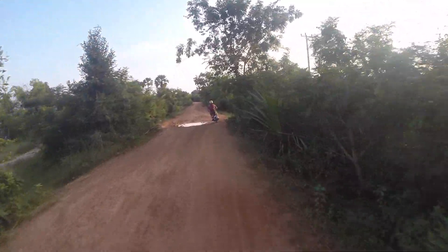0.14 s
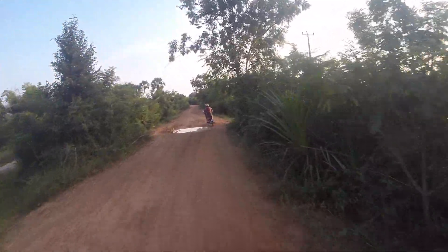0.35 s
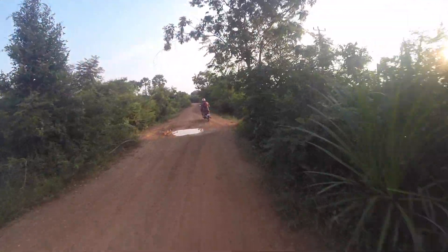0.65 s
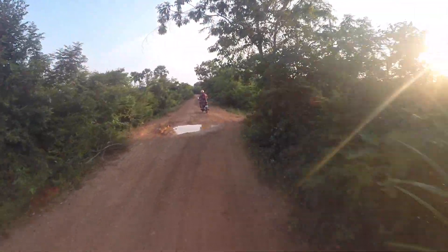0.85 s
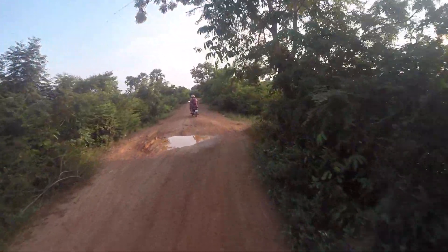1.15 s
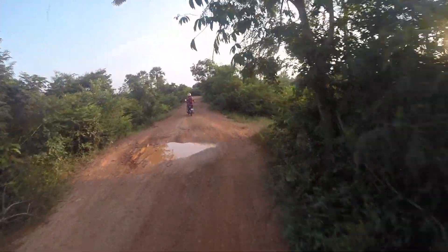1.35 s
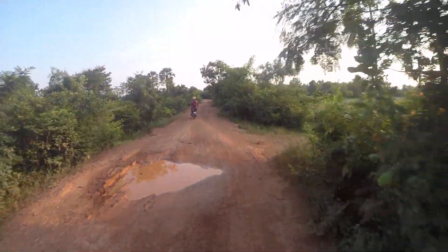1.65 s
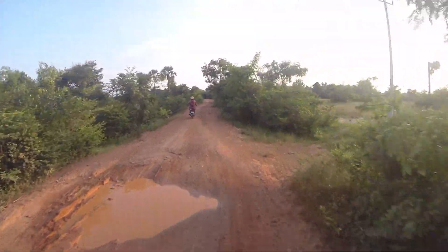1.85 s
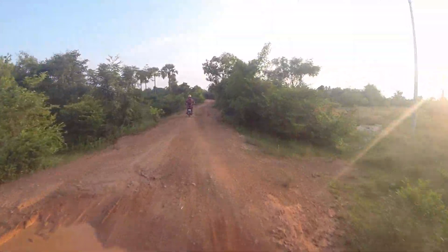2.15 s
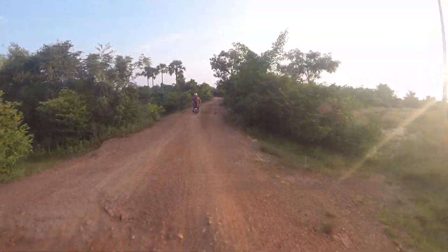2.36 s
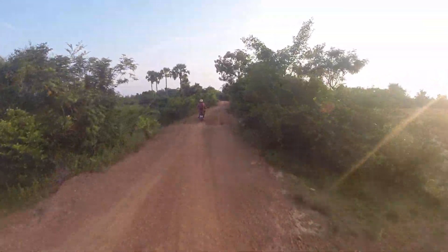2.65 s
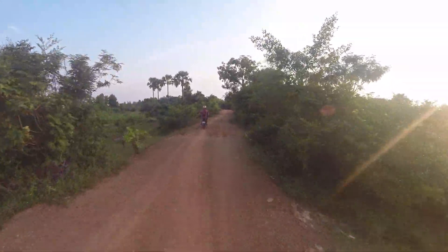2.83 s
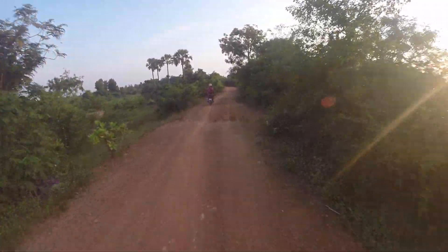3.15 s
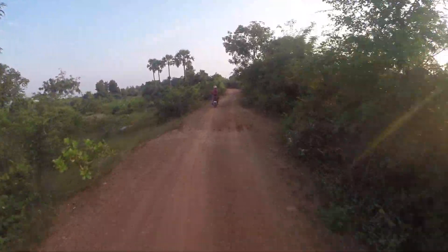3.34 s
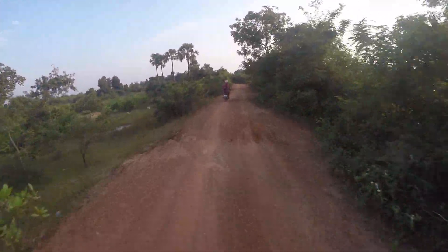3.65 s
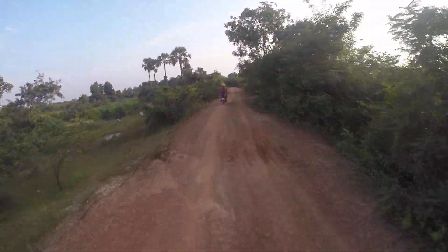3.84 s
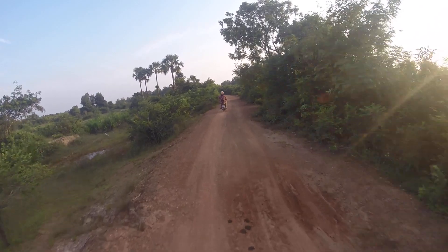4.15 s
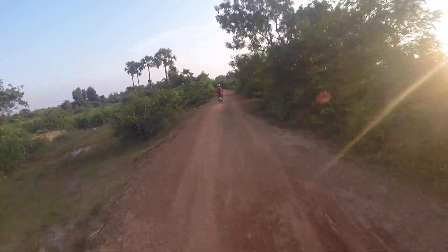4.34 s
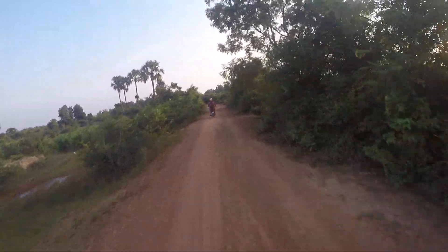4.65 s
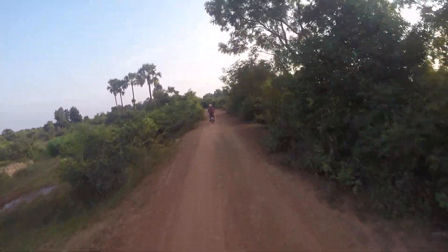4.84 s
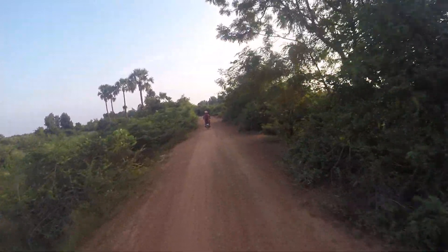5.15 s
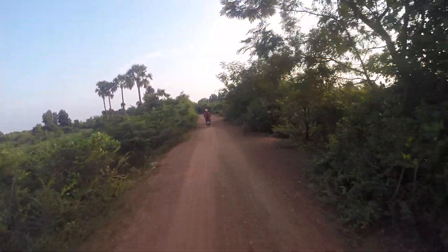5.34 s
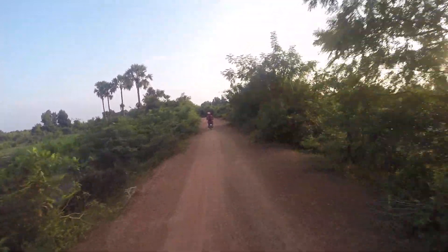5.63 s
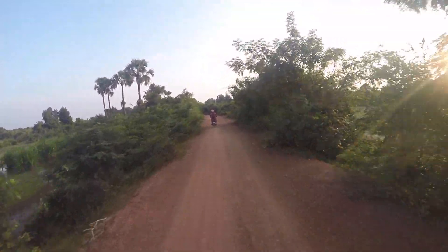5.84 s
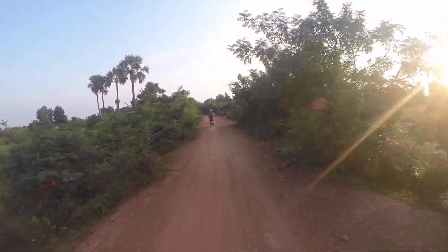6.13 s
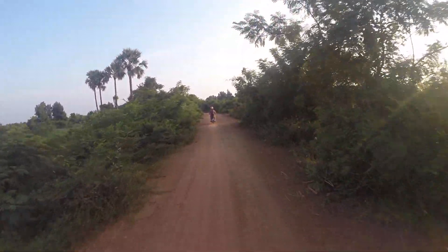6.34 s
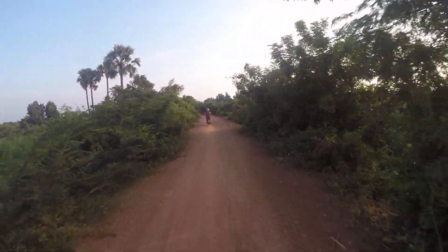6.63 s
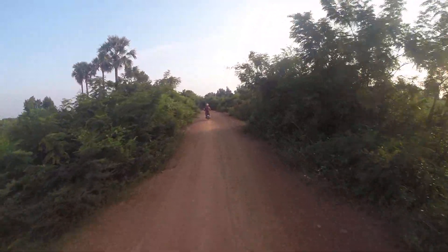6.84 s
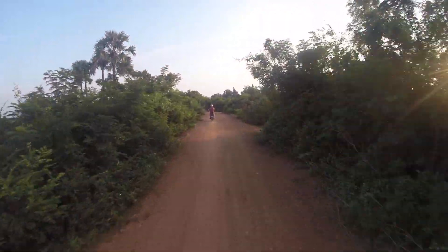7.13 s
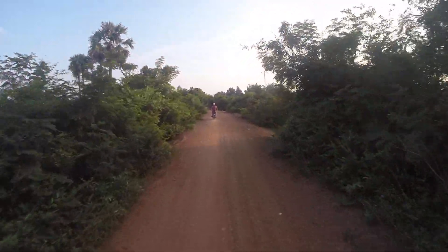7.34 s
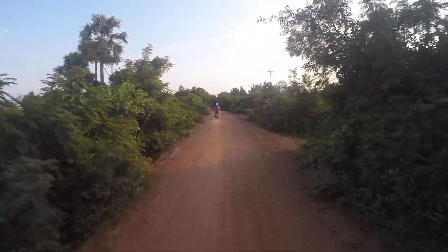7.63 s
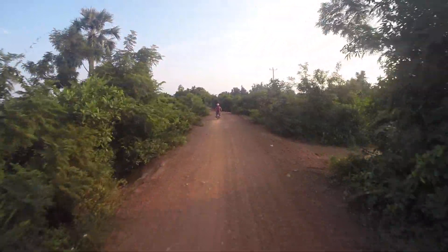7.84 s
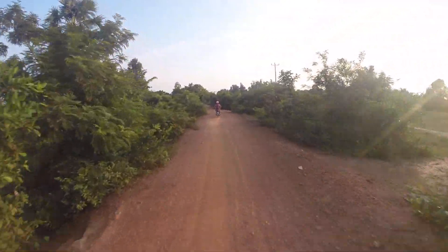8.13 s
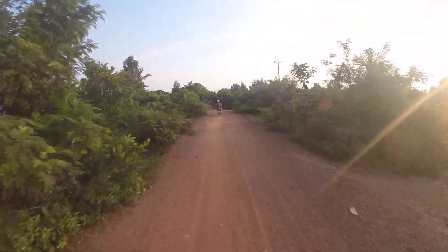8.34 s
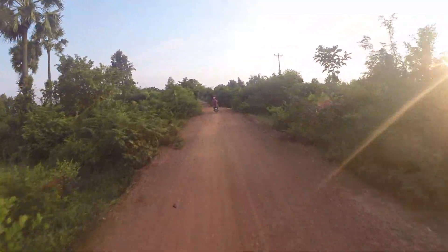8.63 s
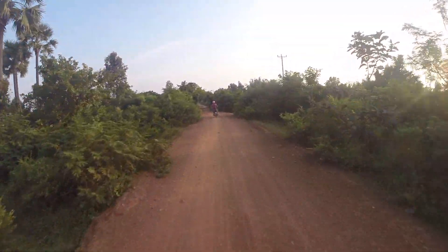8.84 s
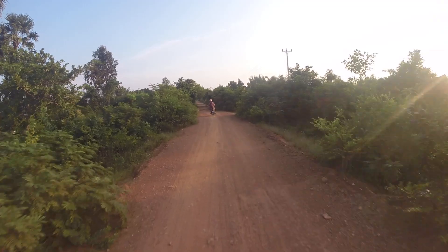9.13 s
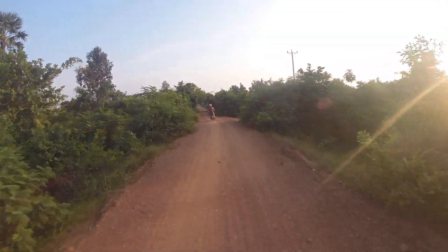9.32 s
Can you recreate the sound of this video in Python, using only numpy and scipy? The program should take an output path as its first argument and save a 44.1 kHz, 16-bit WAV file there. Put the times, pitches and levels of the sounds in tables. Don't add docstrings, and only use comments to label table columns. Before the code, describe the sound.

Close, muffled onboard sound of a small moped speeding up outdoors. Resonant headwind hisses and flutters around the plastic shell, above lumpy road rumble and a swaying low throb. Loose parts tick rapidly at first, then knock repeatedly. One violent bump bangs and clatters around the middle, its low thud dying away. Sparse knocks continue while wind strengthens; the engine stays a faint rising hum, insects are barely audible and electronics whine thinly.

```python
import sys
import numpy as np
from scipy import signal
from scipy.fft import rfft, irfft, next_fast_len
from scipy.io import wavfile
from scipy.ndimage import uniform_filter1d

SR = 44100
rng = np.random.default_rng(int(sys.argv[2]) if len(sys.argv) > 2 else 0)


def put_to_file(sound):
    columns = np.atleast_2d(sound).T
    safe = np.clip(columns, -1, 1)
    whole_steps = np.round(safe * 32767)
    wavfile.write(sys.argv[1], SR, whole_steps.astype(np.int16))


def field_ratio(decibels):
    return 10 ** (np.asarray(decibels, dtype=float) / 20)


N = 418068
T = np.arange(N) / SR

# [t/s, level/dB]
WIND = [(0, -48.5), (.2, -50), (.6, -49), (.92, -52), (1.15, -48.5), (1.5, -46.5), (2.5, -43.5),
        (2.75, -46.5), (3.0, -44), (3.6, -50), (4.2, -45.5), (4.55, -43.5), (4.95, -46), (5.55, -43),
        (6.0, -44), (7.1, -43), (8.0, -40.5), (9.48, -39.5)]
# [t/s, length/s, level/dB, centre f/Hz]
GUSTS = [(0.098, 0.1, -9, 5030), (.42, 0.082, -5, 3200), (0.784, 0.19, -7, 3200), (.85, 0.22, 4, 5500),
         (1.792, 0.14, 3.5, 2130), (2.3, 0.28, -1.5, 3200), (2.532, 0.037, 7.5, 2200),
         (2.763, 0.15, 7.5, 2360), (2.955, 0.072, -11, 3200), (3.205, 0.06, 4, 2650),
         (3.695, 0.29, 5, 2800), (4.193, 0.072, 7, 2950), (4.435, 0.089, -5, 3370), (5.02, 0.11, 9, 2900),
         (5.198, 0.14, -12, 2860), (5.478, 0.16, 8, 2820), (5.686, 0.16, 4, 1110),
         (5.726, 0.076, -8.5, 2800), (5.876, 0.15, 3.5, 3200), (6.1, 0.17, -5, 2950),
         (6.446, 0.12, 3.5, 3240), (6.601, 0.043, 3, 2510), (6.887, 0.12, 7, 3100), (7.28, 0.12, 2.5, 2190),
         (7.426, 0.1, -5.5, 3100), (7.756, 0.21, 1.5, 3300), (8.42, 0.1, -2, 3200), (8.824, 0.054, 3, 3120),
         (9.192, 0.12, 1, 3170), (9.47, 0.061, -6, 3360)]
GUST_OCTAVES, TREBLE_SHARE = 0.51, 0.32
MODE_GROUPS = [1400, 2250, 3200, 5500]
BRIGHT_FROM_HZ = 25.22
BRIGHTENING = [0.65, 2.5, 2.0]
SLOW_BALANCE = [-1, -3, -2.0]
# [f/Hz, width/Hz, level/dB]
HOUSING = [(520, 300, -5), (1027, 570, -7.5), (1289.6, 140, 4.5), (1270, 470, -7.5), (1535, 520, -4.5),
           (2070, 403, -1.5), (2412, 330, 2), (2800, 355, -4), (3170, 384, -3), (3660, 380, -17.5),
           (4600, 1300, -25), (5607, 860, -13), (6930, 1320, -21), (8000, 240, -33), (9740, 1140, -35.5),
           (12000, 790, -37.5)]
TIP_SHARE, TIP_DB = 0.35, -8.5
# [f/Hz, width/Hz, depth/0-1]
NOTCHES = [(2342, 87, 0.65), (2790, 100, 0.69), (6130, 270, 0.46)]

# [f/Hz, level/dB]
FRAME = [(20, -7), (45, -5.5), (75, -1), (120, 3), (170, -4.5), (250, -14.5), (320, -10), (400, -19.5),
         (700, -26), (1500, -61)]
# [t/s, level/dB, swell/s, fade/s]
RIDGES = [(0, -41.5, .1, 2.3), (.87, -48, 0.65, .06), (2.45, -40, 1.2, 1.5), (2.97, -35, 0.27, 0.39),
          (3.27, -43, 0.19, .2), (3.41, -36, 0.059, 0.17), (4.47, -26, 0.091, 0.2), (4.57, -44, .2, .13),
          (3.8, -45, 0.42, 0.45), (4.75, -31.5, 0.036, 0.17), (5.9, -46, 0.26, 1.05),
          (5.38, -39.5, 1.1, 1.1), (7.11, -40, 0.1, 1.7), (9.19, -36, 1.9, 0.095)]
ROAD_DB, ROAD_UPPER_DB = 1.5, -2

# [t/s, level/dB, swell/s, fade/s]
RUTS = [(.08, -37.5, 0.13, 0.035), (.2, -35.5, 0.076, 0.069), (.55, -37.5, 0.033, 0.8),
        (1.05, -35.5, 0.59, 0.044), (1.24, -36.5, 0.14, 0.044), (1.33, -33.5, 0.035, 0.27),
        (1.78, -35, 0.19, 0.05), (2.55, -28.5, 0.69, 0.16), (2.76, -37.5, .05, .12),
        (3.06, -32, 0.28, 0.31), (3.26, -32, 0.48, 0.044), (3.55, -37, 0.23, 0.73),
        (3.75, -37, 0.054, 0.095), (4.09, -32.5, 0.27, 0.033), (4.42, -34, 0.12, 0.27),
        (4.62, -30.5, 0.081, 0.027), (4.81, -29, 0.16, 0.13), (5.33, -31.5, 0.27, 0.25),
        (5.63, -22.5, 0.19, 0.16), (6.22, -38, 0.61, .06), (6.47, -31.5, 0.26, 0.41),
        (7.01, -37, 0.14, 0.38), (7.62, -40, 0.13, 0.69), (8.04, -32.5, 0.081, 0.073),
        (8.47, -38, 1, 0.095), (8.64, -38.5, 0.097, 0.22), (8.96, -37.5, 0.8, 0.08),
        (9.04, -35, 0.063, 0.071), (9.3, -39.5, 0.37, 0.23), (3.9, -48, 0.057, 0.088)]
CALM_DB = -53
SPRING_HZ, SAG_HZ = 39.83, 10

# [t/s, f/Hz]
FIRING = [(0, 19.2), (.4, 19.6), (1, 20.8), (1.5, 21.6), (2, 22.1), (2.8, 21.6), (3.5, 21), (4.3, 21.5),
          (5, 22.5), (5.3, 23.2), (6, 24.2), (6.4, 24.8), (7.5, 26.5), (8, 27.5), (8.5, 28.2), (9, 29.2),
          (9.48, 29.9)]
# [t/s, level/dB]
LOAD = [(0, -5), (.8, -4), (1.1, 0), (2, 0), (2.3, -9), (4.7, -9), (5, -1), (6.5, -1), (7.5, 0), (9.48, 3)]
# [order of the firing rate, level/dB]
ORDERS = [(3, 0), (4, -5), (5, 0), (6, 0), (7, -4), (8, -4), (9, -1), (10, 0), (11, -4), (12, 0), (13, -2)]
# [f/Hz, level/dB rms]
ORDERS_PASSED = [(55, -52), (65, -44.5), (75, -52), (86, -60), (110, -51), (135, -53), (170, -51),
                 (205, -60), (235, -60), (265, -55), (290, -58), (340, -64), (400, -68)]
# [f/Hz, level/dB rms]
CRANK_PASSED = [(38, -50), (42, -56.5), (50, -45), (53, -50), (55, -51), (57, -36), (60, -37)]

# [f/Hz, level/dB rms]
WHINE = [(10644, -81), (10692, -90), (13188, -92)]
# [f/Hz, level/dB]
HISS = [(300, -20), (800, 15), (2000, -9), (3500, -1.5), (4600, 4), (6000, -6), (9000, -10), (11000, -12.5),
        (12700, -20), (13200, -28), (16000, -36)]
HISS_DB = -57.5

# [t/s, level/dB peak, ring f/Hz, t60/s]
KNOCKS = [(.195, -33, 1320, .03), (1.0046, -31, 2090, .025), (1.3005, -34, 1280, 0.03),
          (1.6038, -28, 1250, 0.036), (1.6565, -25.5, 2000, 0.03), (1.6891, -28, 2130, .03),
          (1.718, -32, 2250, .025), (1.746, -29, 2000, .025), (1.761, -26, 2150, .03),
          (1.7898, -28, 2000, .03), (1.828, -29, 2340, .03), (1.846, -28, 2000, .02),
          (1.8714, -26, 2070, 0.03), (1.906, -27, 2380, .025), (2.1605, -25.5, 1270, .03),
          (2.3765, -25, 2020, .02), (2.4703, -28, 1390, 0.024), (2.5172, -36, 2500, 0.025),
          (2.5316, -35, 2480, 0.033), (2.5444, -27, 2060, 0.03), (3.0076, -24, 1320, 0.034),
          (3.5185, -25, 840, 0.011), (3.5196, -21, 1315, 0.03), (4.4149, -24, 1290, .02),
          (4.4415, -18, 1710, 0.013), (4.4522, -24, 1280, 0.012), (4.5311, -24, 1290, 0.028),
          (4.5116, -15, 2010, 0.013), (4.555, -24, 2040, 0.026), (4.563, -28, 1260, 0.07),
          (4.6663, -31, 1310, .07), (5.548, -50, 1283, 0.038), (5.6466, -25, 2100, 0.027),
          (5.9329, -23, 1300, 0.029), (6.4065, -32, 1270, 0.049), (6.4125, -28, 707, 0.014),
          (6.4127, -27, 1267, 0.078), (6.7435, -26, 1310, 0.054), (7.0753, -28, 1290, .04),
          (7.2594, -23, 1330, 0.028), (7.4121, -33, 1340, 0.034), (7.5747, -23, 2460, 0.028),
          (7.8765, -30, 1350, .04), (9.0778, -20, 3180, .02)]
# [t/s, level/dB peak, ring f/Hz]
TICKS = [(0.1925, -49, 5630), (.3193, -42, 5140), (0.3441, -41, 5580), (0.374, -39, 5600),
         (0.4279, -37, 5500), (.4465, -36, 5110), (0.4913, -33, 5320), (0.526, -32, 5250),
         (0.5661, -40, 5640), (0.607, -34, 5240), (0.6479, -39, 5900), (0.6863, -37, 5500),
         (0.7253, -43.5, 4150), (.7254, -40, 7340), (0.768, -34, 5540), (.7898, -36, 5630),
         (.8272, -38, 5290), (.862, -41, 5400), (.876, -39, 5400), (0.896, -34, 5460), (.9459, -41, 5200),
         (.9733, -35, 5300), (0.9854, -34, 5260), (1.4106, -42, 5520), (1.9205, -40, 5580),
         (2.4278, -35, 5730), (3.1333, -45, 5310), (3.8766, -33, 5620), (4.4223, -30, 4690),
         (4.4507, -25.5, 5650), (4.45, -36, 7500), (4.5306, -40, 4730), (4.557, -27, 5000),
         (4.9531, -38, 5530), (5.348, -30, 5360), (5.564, -40, 5690), (7.6709, -27, 5690),
         (8.8073, -19, 5600), (9.1745, -25, 5490)]
# [t/s, level/dB peak]
CLICKS = [(.985, -56), (1.005, -55), (4.428, -46), (4.4525, -52), (4.513, -55), (4.532, -54), (4.556, -49),
          (4.565, -53), (5.575, -53), (5.6, -52), (5.62, -53), (8.81, -44)]
# [t/s, level/dB peak, contact/s, f/Hz]
CRACK = (4.4355, -10, .002, 1750)
# [f/Hz, level/dB, t60/s]
SNAP = [(800, -12, .008), (1400, -9, .014), (2150, -7, .012)]
# [t/s, level/dB peak, f/Hz, t60/s, direction]
BLOWS = [(4.426, -15, 122, 0.16, 0.82), (4.4406, -4, 130, 0.019, 1), (4.437, -25, 230, 0.045, -0.51),
         (4.452, -18, 500, 0.012, 1), (4.4543, -7.5, 34.5, 0.2, 0.92), (4.459, -4.5, 76, 0.03, 1),
         (4.485, -25, 272, 0.049, 0.72), (4.487, -9, 50, 0.077, 1), (4.518, -3, 35.2, 0.29, -0.86),
         (4.521, -13, 112, 0.12, -0.92), (4.572, -13, 60, 0.13, -0.95), (4.575, -34, 470, 0.15, 0.72),
         (4.625, -21, 139, 0.073, -0.74), (4.742, -28, 139, 0.13, -0.94), (4.752, -13.5, 24.2, 0.69, -0.82),
         (4.779, -38, 141, 0.11, 1), (4.81, -12, 33.8, 0.16, 0.93)]

# [start t/s, end t/s, chirps per s, level/dB peak, f/Hz]
BOUTS = [
    (.42, .45, 50, -57, 7520),
    (0.643, .74, 32, -54, 7400),
    (.85, .93, 70, -57, 7450),
    (2.15, 2.17, 33, -56, 9300),
    (2.3, 2.46, 30, -57, 9680),
    (2.55, 2.84, 33, -59, 9750),
    (3.01, 3.08, 20, -60, 9240),
    (5.197, 5.32, 56, -58, 9760),
    (5.374, 5.5, 41, -58, 9700),
]
CHIRP_S, CHIRP_SPREAD_HZ, CHIRP_SPREAD_DB = 0.02, 145, 1.2


def evened(x):
    return x / np.sqrt(np.mean(abs(x) ** 2) + 1e-20)


def curve(rows, t=T):
    s, *columns = np.transpose(rows)
    return np.array([np.interp(t, s, c) for c in columns])


def read(points, hz):
    f, value = np.transpose(points)
    return np.interp(np.log(hz + 1), np.log(f + 1), value)


def add(mix, s, sound):
    part = mix[round(s * SR):][:len(sound)]
    part += sound[:len(part)]


def wander(hz):
    lowpass = signal.butter(2, hz, fs=SR, output="sos")
    return evened(signal.sosfilt(lowpass, rng.standard_normal(N)))


def swells(rows):
    t = T[::64]
    power = 0
    for s, db, swell, fade in rows:
        power = power + field_ratio(2 * db - 40 * np.maximum((s - t) / swell, (t - s) / fade))
    return np.interp(T, t, np.sqrt(power))


def grid(size):
    return np.fft.rfftfreq(size, 1 / SR), np.arange(4 * N // size + 5) * size / 4 / SR


def noise(gain):
    a, b = rng.standard_normal(gain.shape[::-1] + (2,)).T
    size = 2 * (len(gain) - 1)
    return signal.istft(gain * (a + 1j * b), nperseg=size, noverlap=size * 3 // 4)[1][:N]


def ring(hz, t60, rise=.0004):
    t = np.arange(SR // 3) / SR
    return field_ratio(-60 * t / t60) * (1 - np.exp(-(t / rise) ** 2)) * np.sin(2 * np.pi * hz * t)


def housing(hz):
    power = 0
    for f, width, db in HOUSING:
        offset = 2 * (hz - f) / width
        body = 1 / (1 + offset ** 2) ** 2
        tip = field_ratio(2 * TIP_DB) / (1 + (offset / TIP_SHARE) ** 2) ** 2
        power = power + field_ratio(2 * db) * (body + tip)
    response = np.sqrt(power)
    for f, width, depth in NOTCHES:
        response = response * (1 - min(depth, 1) / (1 + (2 * (hz - f) / width) ** 2))
    return response


def turbulence():
    hz, t = grid(size=256)
    excess = np.maximum(curve(FIRING, t)[0] - BRIGHT_FROM_HZ, 0)
    tilt = np.array(SLOW_BALANCE)[:, None] + np.outer(BRIGHTENING, excess)
    groups = np.eye(len(MODE_GROUPS))[1:]
    share = np.array([np.interp(np.log(hz + 1), np.log(MODE_GROUPS), row) for row in groups])
    s, length, db, centre = np.transpose(GUSTS)[:, :, None]
    reach = np.exp(-(np.log2((hz + 1) / centre) / GUST_OCTAVES) ** 2) + TREBLE_SHARE * share[-1]
    side = reach.T @ (db * np.exp(-((t - s) / length) ** 4))
    patches, flicker = rng.standard_normal((len(t), len(hz), 2)).T
    patches = uniform_filter1d(uniform_filter1d(patches, size=5, axis=0), size=40, axis=1)
    flicker = uniform_filter1d(uniform_filter1d(flicker, size=90, axis=0), size=20, axis=1)
    flicker = evened(flicker) * np.clip(hz / 5000, .4, 1.9)[:, None]
    return evened(noise(field_ratio(share.T @ tilt + side + evened(patches) + 1.22 * flicker)))


def grit():
    strength = field_ratio(3.5 * np.minimum(rng.exponential(1, N), 3))
    return evened(strength * (rng.random(N) < 600 / SR) * rng.choice([-1, 1], N))


def rush():
    shake = (turbulence() + 0.4 * grit()) * field_ratio(curve(WIND)[0])
    size = next_fast_len(N + 4096)
    spectrum = rfft(shake, size) * housing(np.fft.rfftfreq(size, 1 / SR))
    return field_ratio(16.0) * irfft(spectrum, size)[:N]


def road():
    hz, t = grid(size=2048)
    level = np.hypot(swells(RIDGES), field_ratio(curve(WIND)[0] + ROAD_DB))
    upper_db = curve(WIND, t)[0] + ROAD_UPPER_DB - 20 * np.log10(np.interp(t, T, level))
    upper = np.clip(np.log2((hz + 1) / 150), 0, 1)[:, None]
    shape = field_ratio(read(FRAME, hz)[:, None] + upper * (upper_db + 10.0))
    return level * field_ratio(0.4 * wander(hz=15.0)) * evened(noise(shape))


def mount():
    swing = np.hypot(swells(RUTS), field_ratio(CALM_DB))
    spring_hz = (SPRING_HZ - SAG_HZ * swing / swing.max()) * (1 + .13 * wander(hz=20))
    spring = np.sin(2 * np.pi * np.cumsum(spring_hz) / SR) * (1 + .55 * wander(hz=22))
    heave_hz = 17 * (1 + .4 * wander(hz=8))
    heave = np.sin(2 * np.pi * np.cumsum(heave_hz) / SR) * field_ratio(3.0 * wander(hz=8))
    return swing * evened(spring + 0.63 * heave)


def engine():
    hz = curve(FIRING)[0]
    phase = 2 * np.pi * np.cumsum(hz) / SR
    hum = np.zeros(N)
    for k, db in ORDERS:
        level = field_ratio(db + read(ORDERS_PASSED, k * hz) + 2.0 * wander(hz=1.5))
        hum += level * np.sin(k * phase + .3 * wander(hz=3))
    crank = field_ratio(read(CRANK_PASSED, 2 * hz) + 1.2 * wander(hz=10)) * np.sin(2 * phase)
    return np.sqrt(2) * (field_ratio(curve(LOAD)[0]) * hum + crank)


def electronics():
    hz, t = grid(size=1024)
    out = field_ratio(HISS_DB) * evened(noise(field_ratio(read(HISS, hz))[:, None] * np.ones(len(t))))
    for f, db in WHINE:
        out += np.sqrt(2) * field_ratio(db) * np.sin(2 * np.pi * f * T + 1.1 * wander(hz=5))
    return out


def ticks():
    out = np.zeros(N)
    for s, db, hz in TICKS:
        partials = .3 * ring(1.3 * hz, .005) + .5 * ring(.8 * hz, .005)
        add(out, s + .001, field_ratio(db - 1.5) * (ring(hz, .009, .001) + partials))
    return out


def knocks():
    out = np.zeros(N)
    for s, db, hz, t60 in KNOCKS:
        add(out, s, field_ratio(db - 2.5) * (ring(hz, t60, .001) + .3 * ring(1.2 * hz, .6 * t60)))
    return out


def clicks():
    out = np.zeros(N)
    latch = signal.butter(5, [7500, 12000], "band", fs=SR, output="sos")
    fade = field_ratio(-60 * np.arange(400) / SR / .016) * np.hanning(800)[400:]
    for (s, db), grain in zip(CLICKS, rng.standard_normal((len(CLICKS), 400))):
        add(out, s, signal.sosfilt(latch, field_ratio(db - 3) * fade * grain))
    return out


def blows():
    out = np.zeros(N)
    for s, db, hz, t60, direction in BLOWS:
        add(out, s, direction * field_ratio(db) * ring(hz, t60, .25 / hz))
    return out


def crack():
    out = np.zeros(N)
    s, db, contact, hz = CRACK
    t = np.arange(-contact / 2, contact / 2, 1 / SR)
    add(out, s, -field_ratio(db) * np.hanning(len(t)) * np.cos(2 * np.pi * hz * t))
    for f, mode_db, t60 in SNAP:
        add(out, s + contact / 2, field_ratio(db + mode_db) * ring(f, t60, .0006))
    add(out, s + .002, field_ratio(db - 19) * (ring(1290, .04) + ring(2300, .02) + ring(550, .03)))
    return out


def insects():
    out = np.zeros(N)
    t = np.arange(round(1.4 * CHIRP_S * SR)) / SR
    for start, end, rate, db, hz in BOUTS:
        late, up, loud = rng.standard_normal((12, 3)).T
        fuzz = evened(uniform_filter1d(rng.standard_normal((12, 2000)), size=24))[:, :len(t)]
        for k, s in enumerate(np.arange(start, end, 1 / rate)[:12]):
            tone = np.sin(2 * np.pi * (hz + CHIRP_SPREAD_HZ * up[k]) * t)
            strokes = np.hanning(len(t)) * (0.79 + fuzz[k])
            level = field_ratio(db - 9.0 + CHIRP_SPREAD_DB * loud[k])
            add(out, s + abs(late[k]) * 0.16 / rate, level * strokes * tone)
    return out


def scene():
    steady = rush() + road() + mount() + engine() + electronics()
    impacts = ticks() + knocks() + clicks() + blows() + crack()
    return (steady + impacts + insects())[None]


def roll_off(x):
    return signal.sosfilt(signal.butter(12, 15260, fs=SR, output="sos"), x)


def record(dry):
    low_cut = signal.butter(2, 7, "high", fs=SR, output="sos")
    mix = signal.sosfilt(low_cut, dry)
    return roll_off(mix)


dry = scene()
out = record(dry)
put_to_file(out)
```